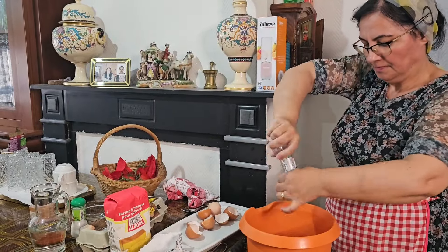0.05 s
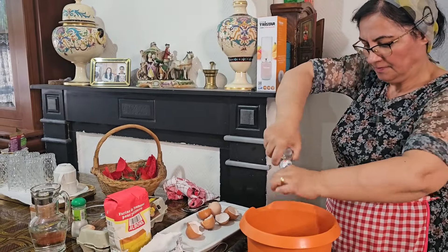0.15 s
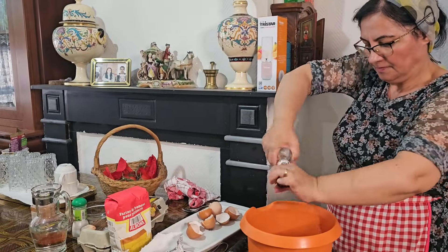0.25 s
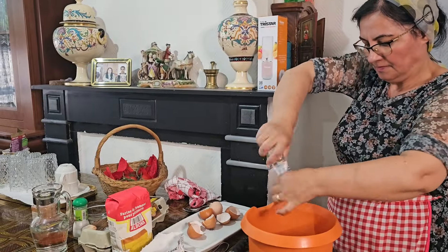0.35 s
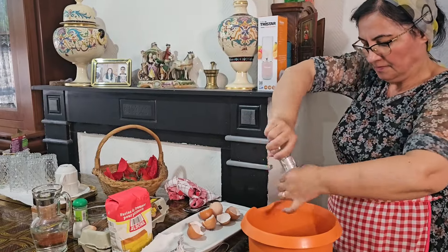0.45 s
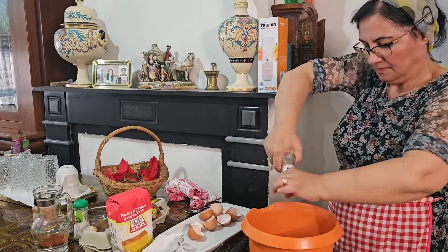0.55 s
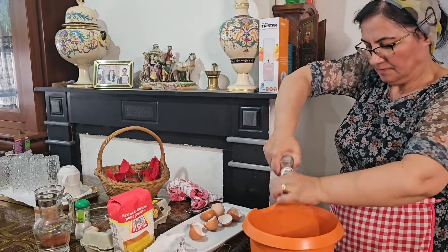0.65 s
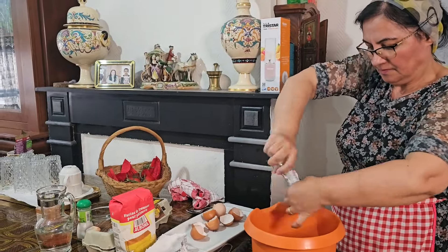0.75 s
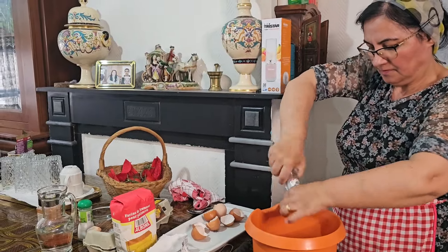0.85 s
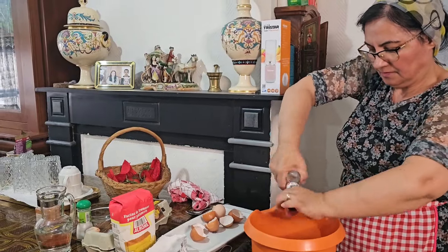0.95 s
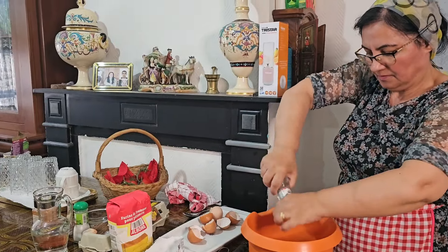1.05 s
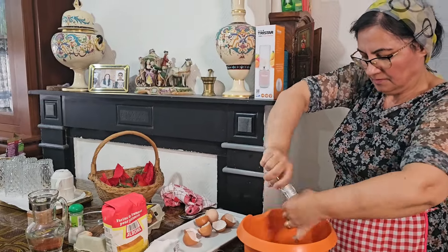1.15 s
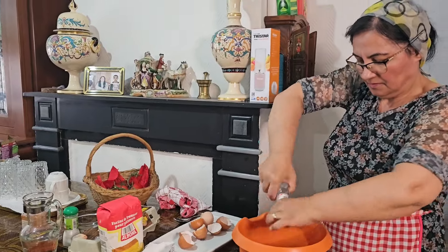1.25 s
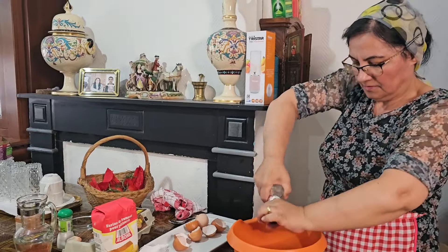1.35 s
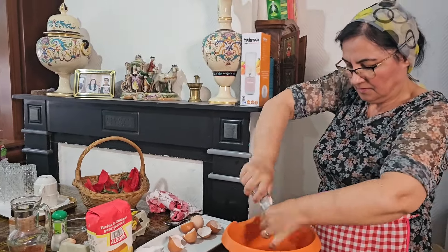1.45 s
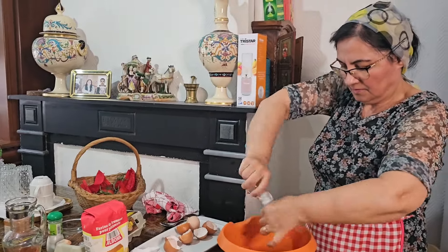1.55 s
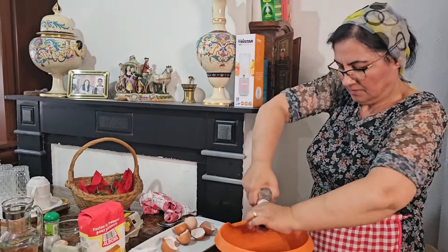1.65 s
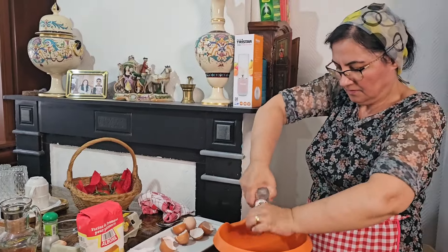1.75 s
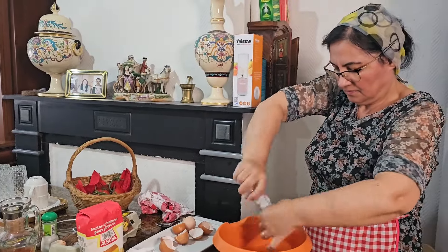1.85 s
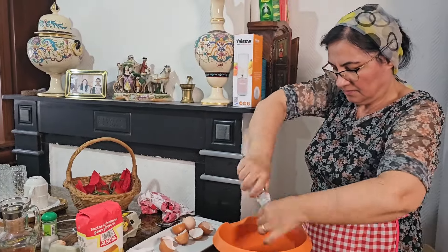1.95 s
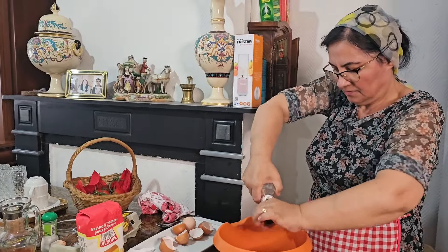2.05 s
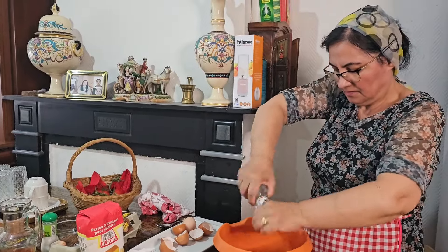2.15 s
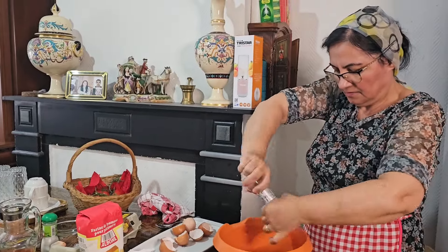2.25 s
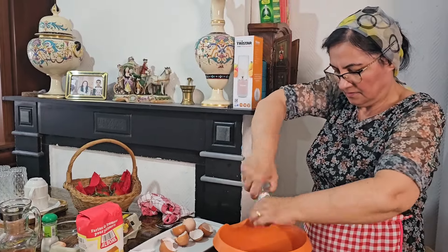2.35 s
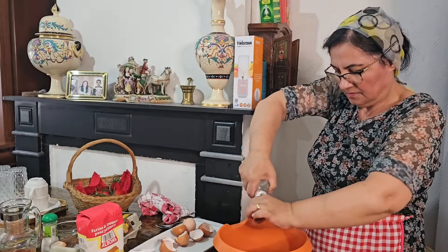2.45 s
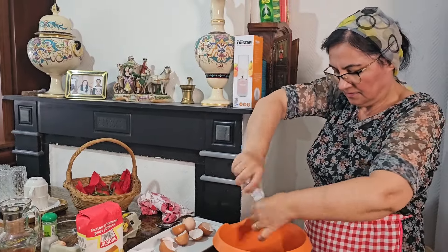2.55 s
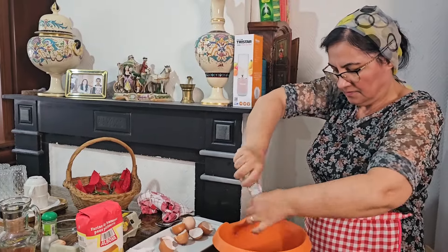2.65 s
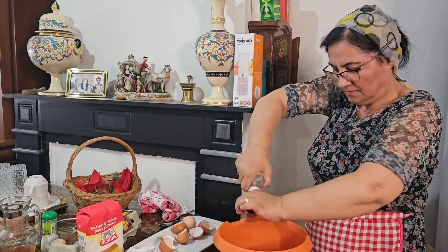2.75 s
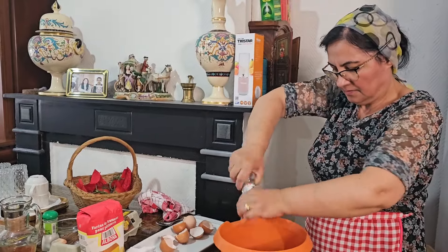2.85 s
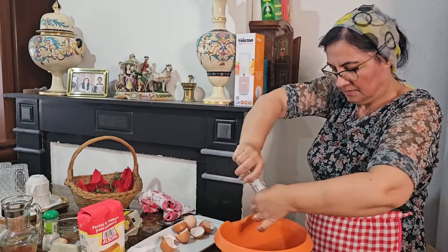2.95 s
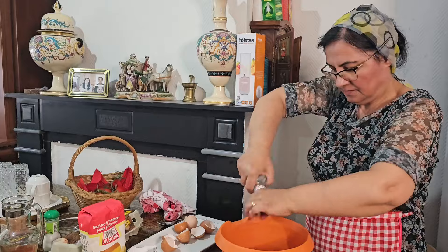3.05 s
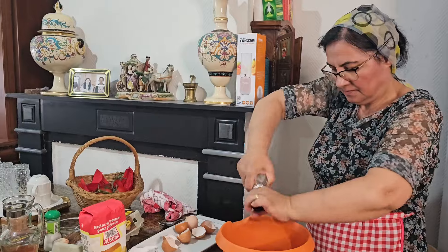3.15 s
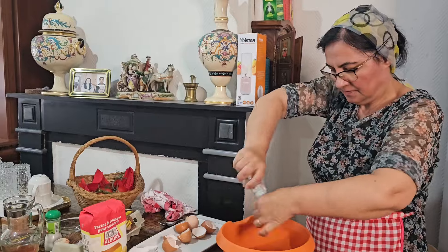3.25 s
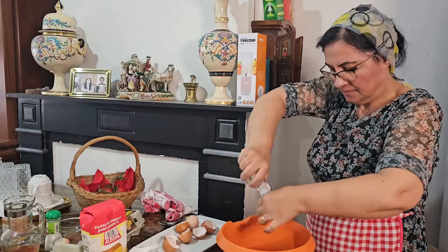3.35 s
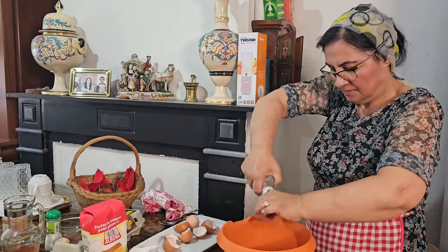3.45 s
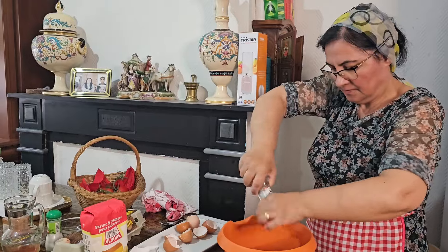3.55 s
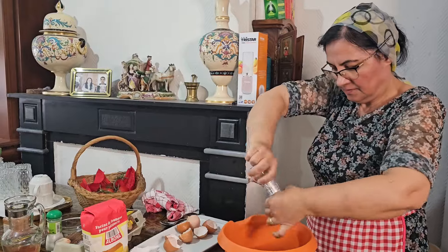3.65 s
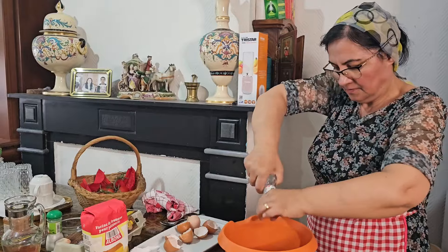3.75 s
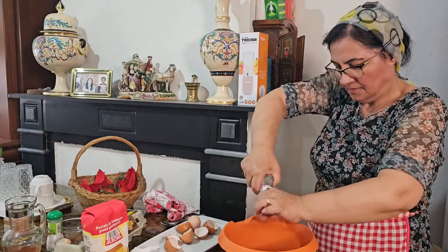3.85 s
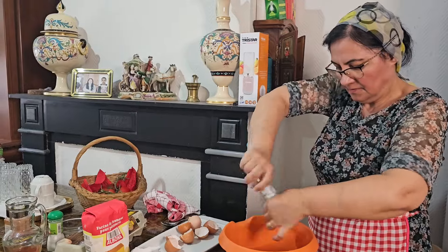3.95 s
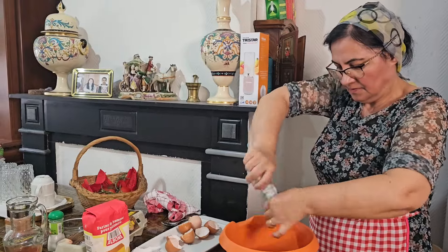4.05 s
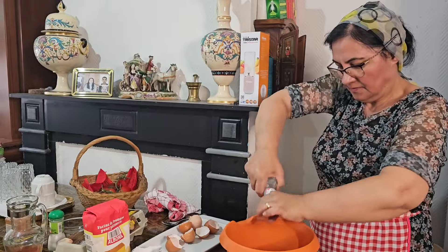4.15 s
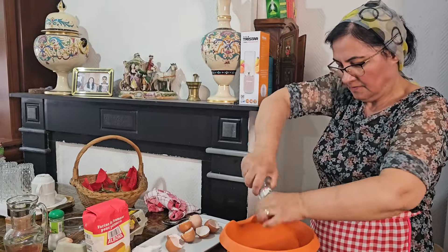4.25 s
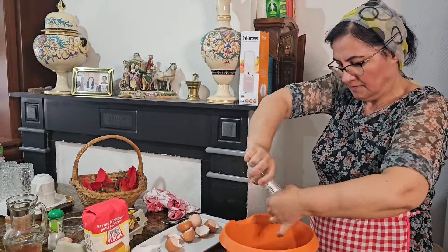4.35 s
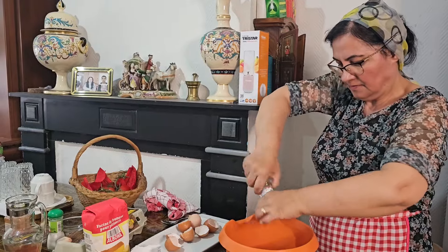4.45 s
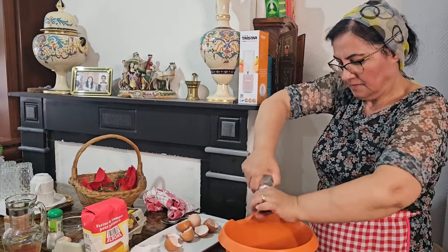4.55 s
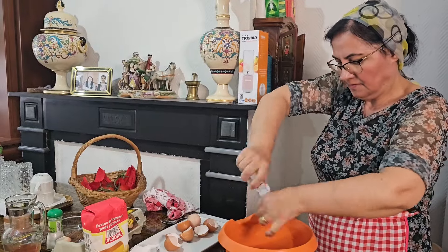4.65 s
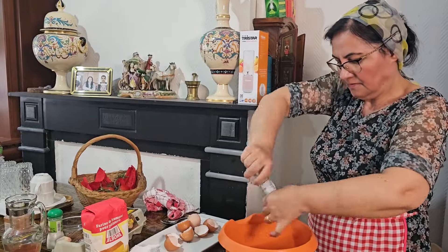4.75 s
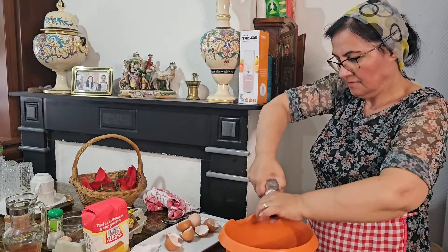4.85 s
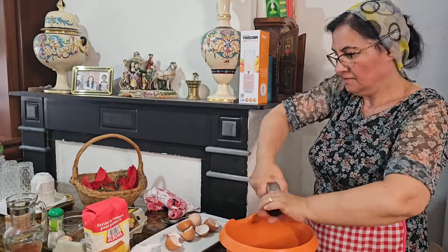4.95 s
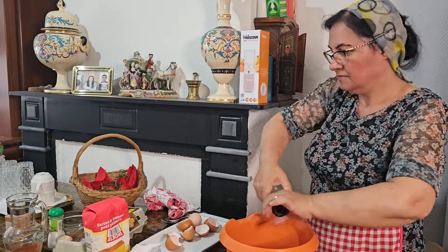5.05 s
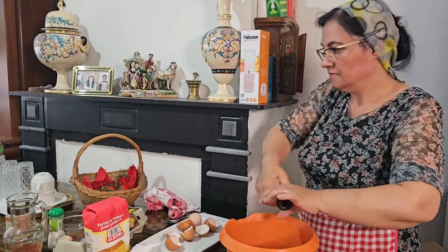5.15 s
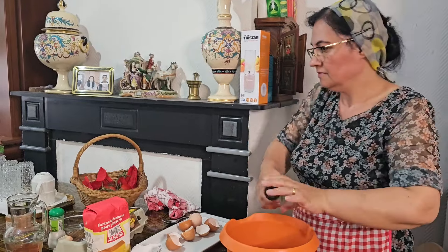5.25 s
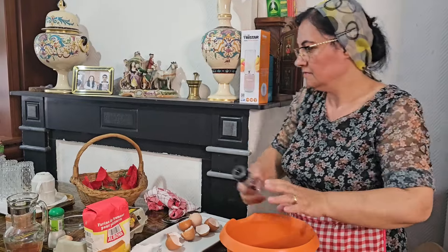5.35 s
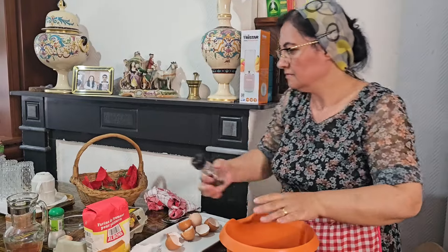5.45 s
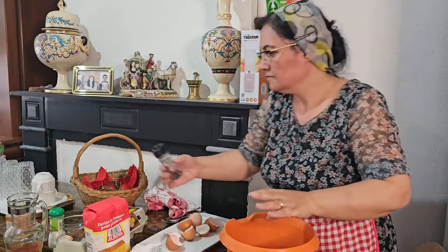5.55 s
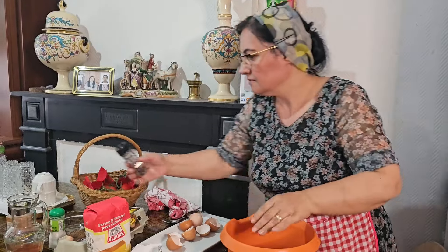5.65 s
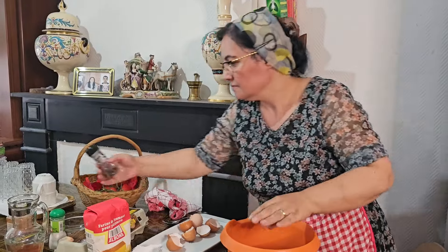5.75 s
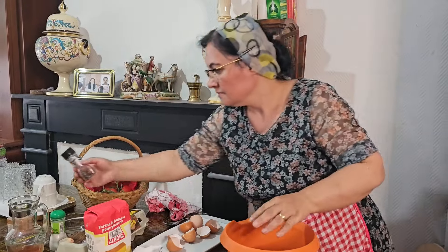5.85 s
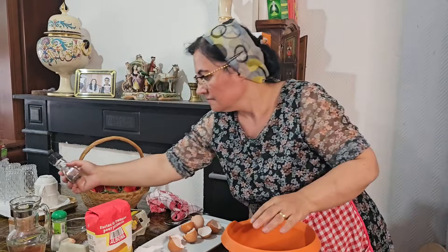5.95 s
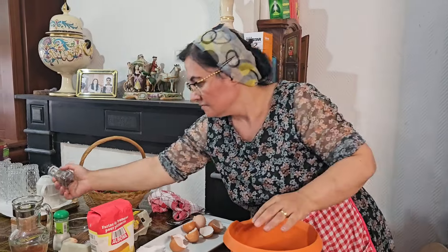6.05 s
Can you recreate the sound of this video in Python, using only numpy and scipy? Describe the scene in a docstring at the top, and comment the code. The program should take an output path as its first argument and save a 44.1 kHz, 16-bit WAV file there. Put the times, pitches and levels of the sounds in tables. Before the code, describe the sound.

Quick to-and-fro twisting of a small pepper mill: short grainy scrapes, light return rubs and irregular sharp cracks, the strongest about one second in. One tiny dull squeak passes midway. The body rings briefly, woody and damped, with short lively reflections from hard walls. A low, slightly wavering hum and quiet hiss lie beneath, left alone after the last cracks near five seconds. Close stereo pickup, almost centred.

```python
"""A hand pepper mill is twisted to and fro over a bowl in a hard-walled room, nearly three times a second.
Each twist is a stream of crushed crumbs, heard as short noise grains; peppercorns crack as brighter bursts
and leave splinters that are ground at once; once the body squeaks with hardly any snap. Breaks ring the
mill's damped body modes and jolt it. Turning back, the burrs rub lightly; the end of an earlier twist opens
the scene. Early echo and diffuse decay form the room; an appliance hums in slightly wavering sine lines
over soft, coloured noise."""
import sys
import numpy as np
from scipy import signal
from scipy.fft import rfft, irfft
from scipy.io import wavfile

SR = 44100
rng = np.random.default_rng(int(sys.argv[2]) if len(sys.argv) > 2 else 0)


def wrap_up_sound(samples):
    """Save the sound to the file named by the first command line argument, as 16-bit audio."""
    columns = np.atleast_2d(samples).T
    # keep every value between -1 and 1, then stretch to whole-number steps
    tamed = np.clip(columns, -1, 1)
    steps = np.round(tamed * 32767).astype(np.int16)
    wavfile.write(sys.argv[1], SR, steps)


N = 269010
TIME = np.arange(N) / SR

# peppercorns cracking, and at 3.029 s a short body squeak with hardly any snap:
# (time [s], relative level [dB], body ring relative to the snap [dB], favoured ring pitch [Hz])
CRACKS_AND_SQUEAK = [(0.093, -27.5, -17, 1990), (0.2918, -19.5, -7.5, 1980), (0.3032, -18.5, -2, 2016),
                     (0.624, -23, -12, 1900), (0.655, -14.5, -23, 1870), (0.6658, -23.5, -0.5, 2020),
                     (0.6797, -12, -6.5, 2033), (0.9666, -30.5, -9, 1970), (1.029, -24, -1, 1930),
                     (1.0414, -5.5, -3.5, 2033), (1.1796, -30.5, -9, 1960), (1.3832, -8, -8.5, 1910),
                     (1.5954, -38, -2, 1930), (1.72, -28.5, -10, 1900), (1.7847, -16.5, -22, 1940),
                     (2.0904, -27.5, -7, 1960), (2.105, -20.5, 0, 1878), (2.4734, -26, -0.5, 1940),
                     (2.5374, -25, -14, 2330), (2.8268, -25.5, -8, 1910), (2.8814, -16, -20, 2070),
                     (2.9046, -15.5, -9, 2340), (3.029, -34.5, 8, 1940), (3.1542, -21.5, -12, 1830),
                     (3.2201, -19, -12, 2020), (3.3353, -29, -15, 2310), (3.3837, -27.5, -0.5, 1870),
                     (3.511, -23, -27, 1878), (3.851, -14.5, -28, 1850), (3.9277, -17, -12, 2020),
                     (4.191, -33, -9, 1870), (4.4087, -30, -1.5, 1840), (4.574, -26, -2.5, 1800),
                     (4.6127, -19, -11.5, 2410), (4.9198, -16, -24, 2300), (4.9351, -25, -1.5, 2270),
                     (4.9884, -17, -9.5, 2280)]


def from_db(db):
    """Level to amplitude: 20 dB is a factor of ten."""
    return 10 ** (np.asarray(db) / 20)


def unit_energy(x):
    """Energy normalisation: each channel's squares sum to one."""
    return x / np.sqrt(np.sum(x ** 2, axis=-1, keepdims=True) + 1e-20)


def at_hz(points, hz):
    """Interpolation on a logarithmic frequency axis, on which equal intervals are equal distances."""
    knots, values = np.transpose(points)
    return np.interp(np.log(np.maximum(hz, 1)), np.log(knots), values)


def drift(rate):
    """Slow random modulation: straight lines between normal draws, `rate` of them a second."""
    knots = rng.standard_normal(int(N / SR * rate) + 2)
    return np.interp(TIME * rate, np.arange(len(knots)), knots)


def convolve(x, response):
    """Linear filtering: convolution with an impulse response."""
    return signal.fftconvolve(np.atleast_2d(x), np.atleast_2d(response), axes=-1)[:, :N]


def add(track, s, sound):
    """Superposition: mix a short sound into a track at a time in seconds."""
    at = int(np.clip(s * SR, 0, N - 1))
    track[:, at:at + sound.shape[-1]] += sound[..., :N - at]


def colour(spectrum, size=4096):
    """Minimum-phase filter: folding the cepstrum makes a spectrum causal; its energy is set to one."""
    log_gain = np.log(from_db(at_hz(spectrum, np.fft.rfftfreq(size, 1 / SR))))
    cepstrum = irfft(log_gain)
    folded = 2 * cepstrum[:size // 2]
    return unit_energy(irfft(np.exp(rfft(folded, size))))


def stereo_noise(likeness, size):
    """Interchannel coherence: white mid and side noise, weighted to give the tabled correlation."""
    mid, side = rfft(rng.standard_normal((2, size)))
    alike = np.clip(at_hz(likeness, np.fft.rfftfreq(size, 1 / SR)), -1, 1)
    left_right = np.sqrt(1 + alike) * mid + np.sqrt(1 - alike) * side * [[1], [-1]]
    return irfft(left_right, size) / np.sqrt(2)


def mode(hz, width, size):
    """Damped resonance: the decay follows the bandwidth, scaled to one spectral height at any width."""
    t = TIME[:size]
    return width * np.exp(-np.pi * width * t) * np.sin(2 * np.pi * hz * t)


def appliance_hum():
    """Tonal hum: sine lines whose amplitude and phase waver by slow complex modulation."""
    # hum lines: (frequency [Hz], relative level [dB], waver [0-1])
    hum_lines = [(49.2, -49.5, 0.25), (99.2, -59.5, 0.2), (163.7, -55, 0.18), (263.6, -61.5, 0.34),
                 (301, -66, 0)]
    hum = 0
    for hz, db, waver in hum_lines:
        carrier = np.exp(2j * np.pi * (hz * TIME + rng.random()))
        modulation = 1 + waver * (drift(16) + 1j * drift(12))
        hum = hum + from_db(db) * np.sqrt(2) * (carrier * modulation).real
    return hum


def room_air():
    """Broadband background: partly coherent stereo noise through a spectral filter."""
    # spectrum of the air noise: (frequency [Hz], relative density [dB])
    air_spectrum = [(20, 0), (45, -23), (75, -9), (135, 3), (190, -5), (250, 3), (340, -3), (430, -10.5),
                    (750, -10.5), (1000, -15), (1600, -9.5), (4400, -12.5), (7000, -17.5), (15000, -23.5)]
    # left-right correlation of the air noise: (frequency [Hz], correlation [-1 to 1])
    air_likeness = [(60, 0.018), (290, 0.82), (640, 0.31), (1400, 0.085), (15000, 0.062)]
    return from_db(-52.5) * convolve(stereo_noise(air_likeness, N), colour(air_spectrum))


def background():
    """Superposition of the hum lines and the soft rush of the room."""
    return appliance_hum() + room_air()


def reverb_tail(build_s, gap_s, size=32768):
    """Diffuse decay: after a gap the noise builds up, then each band dies exponentially by its T60."""
    # left-right correlation of the reflections: (frequency [Hz], correlation [-1 to 1])
    tail_likeness = [(300, 0.82), (2000, 0.2), (4000, 0.033), (15000, 0.22)]
    # reverberation time: (frequency [Hz], time to fall by 60 dB [s])
    decay_times = [(400, 0.31), (2000, 0.32), (4500, 0.32), (8000, 0.32), (15000, 0.3)]
    t, hz = TIME[:size], np.fft.rfftfreq(size, 1 / SR)
    noise, tail = rfft(stereo_noise(tail_likeness, size)), 0
    centres = np.geomspace(250, 16000, 7)
    for centre, share in zip(centres, np.eye(len(centres))):
        band = irfft(noise * at_hz(np.column_stack([centres, share]), hz))
        tail = tail + band * from_db(-60 * t / at_hz(decay_times, centre))
    build_up = 1 - np.exp(-np.maximum(t - gap_s, 0) / build_s)
    return unit_energy(tail * build_up)


def in_room(sound, count=5):
    """Direct sound, early echo and reverberation; the mill wanders, so reflection patterns crossfade."""
    tail_db = 2.5  # relative to the direct sound
    moments = np.linspace(0, TIME[-1], count)
    reverberation = 0
    for near in np.eye(count):
        share = np.interp(TIME, moments, near)
        tail = reverb_tail(build_s=0.00066, gap_s=0.00037)
        reverberation = reverberation + convolve(sound * np.sqrt(share), tail)  # equal-power crossfade
    # first echo, off the table top: (delay [s], level relative to the direct sound [dB])
    echo_s, echo_db = (0.0065, -8.5)
    echo = np.pad(sound, [(0, 0), (int(echo_s * SR), 0)])[:, :N]
    return sound + from_db(echo_db) * echo + from_db(tail_db) * reverberation


def body_ring(pitch_hz, favour_db=6, reach_hz=140):
    """Modal synthesis: one knock excites damped body modes, those near the given pitch favoured."""
    # modes of the mill's body: (frequency [Hz], bandwidth [Hz], relative level [dB])
    body_modes = [(328, 39, -24.5), (406, 61, -22.5), (499, 49, -10), (1794, 116.5, 0.5), (1979, 148, 2.5),
                  (2154, 159, 0.5), (2356, 125, -3.5)]
    ring = 0
    for k, (hz, width, db) in enumerate(body_modes):
        favour = np.exp(-((hz - pitch_hz) / reach_hz) ** 2)
        gain = from_db(db + favour_db * favour)
        ring = ring + (-1) ** k * gain * mode(hz, width, size=1024)  # modes alternate in sign
    return unit_energy(ring)


def pitch_at(s):
    """Boundary damping: the hand's grip decides which pitch rings most, interpolated between table rows."""
    times, db, ring_db, hz = np.transpose(CRACKS_AND_SQUEAK)
    return np.interp(s, times, hz)


def crumb_runs():
    """Friction and crushing in stretches: (start s, length s, run-up s, level dB, fade dB, ring dB)."""
    # grinding twists: (start [s], length [s], relative grit level [dB], body ring relative to it [dB])
    twist_table = [(0.245, 0.13, -43.5, -4), (0.611, 0.094, -38.5, -5.5), (0.954, 0.048, -43, -2.5),
                   (1.327, 0.075, -46, -1), (1.708, 0.086, -42, -0.5), (2.074, 0.095, -41, -11),
                   (2.435, 0.057, -41, -6.5), (2.776, 0.13, -47.5, -2.5), (3.136, .09, -41.5, -6),
                   (3.485, .109, -46, 1), (3.82, 0.067, -38, -8.5), (4.186, 0.066, -43.5, -7),
                   (4.543, .127, -46.5, -5.5), (4.894, 0.085, -44.5, -5.5)]
    # light turns back; the first row is the end of an earlier twist:
    # (start [s], relative grit level [dB], body ring relative to it [dB])
    light_run_table = [(0.0, -48.5, -7.5), (0.085, -46, -4), (0.43, -52.5, 6), (0.8, -51, 3.5),
                       (1.172, -49, 1), (1.545, -46, -7), (1.92, -52.5, -0.5), (2.268, -52, -4.5),
                       (2.63, -50, -0.5), (3.015, -51, 7), (3.34, -46, -3), (3.67, -51, -1.5),
                       (4.02, -52, -1), (4.387, -45, -4.5), (4.74, -48.5, -6.5)]
    run_up_s = 0.014  # the burrs take this long to come up to speed
    twist_fade_db = 1.5  # the grit thins a little as a twist goes on
    light_run_s, light_run_fade_db = 0.08, 11.5  # each runs out as the loose crumbs clear
    splinters_s, splinters_db, splinters_fade_db = 0.033, -28.5, 4  # level relative to the table row's
    splinters_ring_db = 4.5  # the body ring is this much stronger, for their size, than the row's own

    twists = [(s, length, run_up_s, db, twist_fade_db, ring_db)
              for s, length, db, ring_db in twist_table]
    light_runs = [(s, light_run_s, run_up_s, db, light_run_fade_db, ring_db)
                  for s, db, ring_db in light_run_table]
    splinters = [(s, splinters_s, 0, db + splinters_db, splinters_fade_db, ring_db + splinters_ring_db)
                 for s, db, ring_db, hz in CRACKS_AND_SQUEAK]
    return twists + light_runs + splinters


def grit(per_s, spread_db, grain_s, grit_db, size=256, count=96):
    """Granular excitation: crumbs break at uneven moments and sizes, each a noise grain and a body ring."""
    snaps, rings = np.zeros((2, 2, N))
    fade = np.exp(-TIME[:size] / grain_s)
    for start, length, run_up_s, db, fade_db, ring_db in crumb_runs():
        crumbs = max(int(length * per_s), 2)
        place, bulk, side = rng.random((3, count))[:, :crumbs]
        progress = (np.arange(len(place)) + place) / len(place)  # one crumb in each equal slot
        times = start + length * progress
        # the cube makes large crumbs rare; a run's energy follows its length
        sizes = unit_energy(from_db(spread_db * bulk ** 3)) * np.sqrt(length * SR)
        speed = np.minimum(length * progress / max(run_up_s, 1 / SR), 1)
        gains = sizes * speed * from_db(grit_db + db - fade_db * progress)
        pushes = np.sign(side - .5)
        grains = unit_energy(rng.standard_normal((count, 2, size)) * fade)
        ring = from_db(ring_db) * body_ring(pitch_at(start + length / 2))
        for s, gain, push, grain in zip(times, gains, pushes, grains):
            add(snaps, s, gain * grain)
            add(rings, s, gain * push * ring)
    return snaps, rings


def jolts():
    """Impulse response of the hand-held mill: low modes, stronger the more the body is kicked."""
    # modes of the jolted mill: (frequency [Hz], bandwidth [Hz], relative level [dB])
    thud_modes = [(335, 54, 4), (409, 84, 4), (477, 70, -1), (786, 47, -9.5)]
    jolt_db, follows_ring = -13.5, 0.35  # level relative to the row's; dB of jolt per dB of body ring
    track = np.zeros((2, N))
    thud = 0
    for k, (hz, width, db) in enumerate(thud_modes):
        thud = thud + (-1) ** k * from_db(db) * mode(hz, width, size=2048)
    thud = unit_energy(thud)
    for s, db, ring_db, hz in CRACKS_AND_SQUEAK:
        add(track, s, from_db(db + jolt_db + follows_ring * ring_db) * thud)
    return track


def fracture(rise_s, alike, treble_db, size=512):
    """Brittle fracture: many tiny breaks as a broadband noise burst, about 2 ms in envelope."""
    shape = TIME[:size] / rise_s * np.exp(1 - TIME[:size] / rise_s)
    tilt = from_db(at_hz([(4000, 0), (13000, treble_db)], np.fft.rfftfreq(size, 1 / SR)))
    spectrum = rfft(shape * stereo_noise([(1, alike)], size))
    flatter = spectrum / np.sqrt(abs(spectrum) + 1e-12)  # halves the spectrum's ups and downs in dB
    return unit_energy(irfft(tilt * flatter) * shape ** 0.058)


def cracks_and_squeak(snap_db, knock_db):
    """Impulsive excitation: a snap, brighter the higher its level, and one ring; the squeak is mostly ring."""
    bright_above_db, treble_db_per_db = -22.5, 0.61
    snaps, rings = np.zeros((2, 2, N))
    for s, db, ring_db, pitch_hz in CRACKS_AND_SQUEAK:
        treble_db = treble_db_per_db * (db - bright_above_db)
        snap = fracture(rise_s=0.00087, alike=0.49, treble_db=treble_db)
        add(snaps, s, from_db(db + snap_db) * snap)
        add(rings, s, from_db(db + ring_db + knock_db) * body_ring(pitch_hz))
    return snaps, rings


def mill():
    """Two radiation paths: the air takes up filtered snaps directly, and the ringing, jolted body."""
    # spectrum of a breaking husk's snap: (frequency [Hz], relative density [dB])
    snap_spectrum = [(150, -54), (450, -6.5), (900, -31), (1400, -6), (2200, 3), (2800, -1), (3600, 4),
                     (5500, 0), (7400, 1.5), (9300, -2.5), (10300, -6.5), (11500, -2), (13000, -7),
                     (15500, -11)]
    crack_snaps, body_rings = cracks_and_squeak(snap_db=12.5, knock_db=13.5)
    grit_snaps, grit_rings = grit(per_s=380, spread_db=15, grain_s=0.0016, grit_db=-0.5)
    snaps = convolve(crack_snaps + grit_snaps, colour(snap_spectrum))
    return snaps + body_rings + grit_rings + jolts()


def scene():
    """Level panning: the mill in its room and the background, all a touch to the left."""
    left_right_gain = from_db([[.5], [-.5]])
    return (in_room(mill()) + background()) * left_right_gain


def record(dry):
    """Band limiting: a steep elliptic low-pass cuts the top above 15.7 kHz."""
    low_pass = signal.ellip(10, .2, 70, 15700, fs=SR, output="sos")  # ripple and stop band in dB
    return signal.sosfilt(low_pass, dry)


dry = scene()
out = record(dry)
wrap_up_sound(out)
```